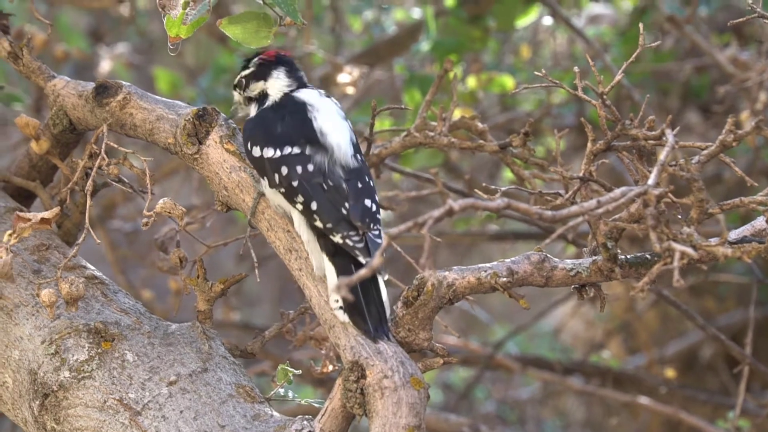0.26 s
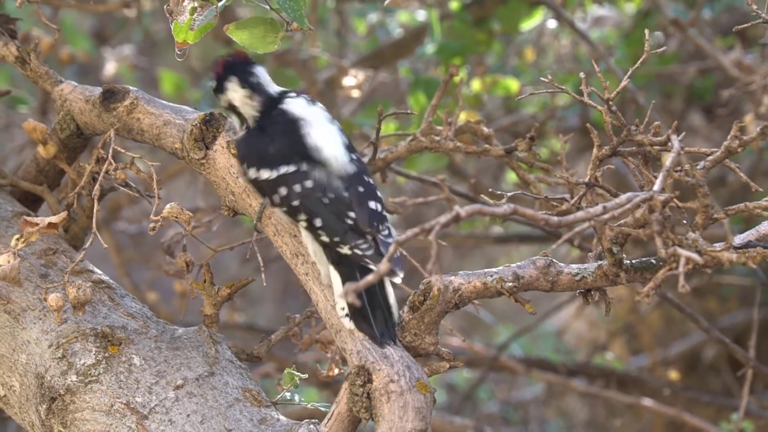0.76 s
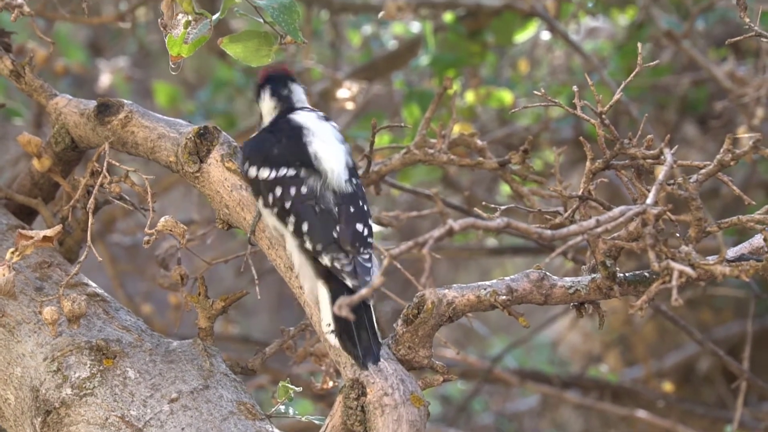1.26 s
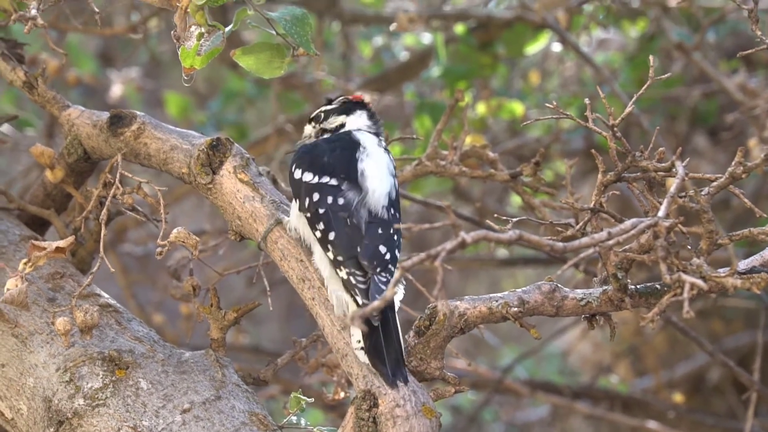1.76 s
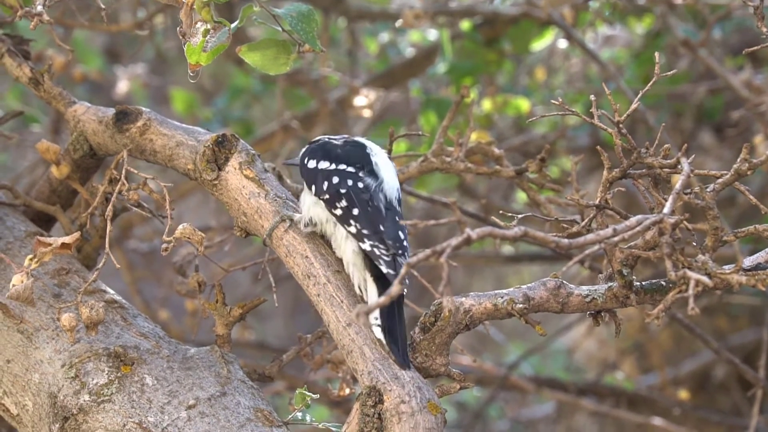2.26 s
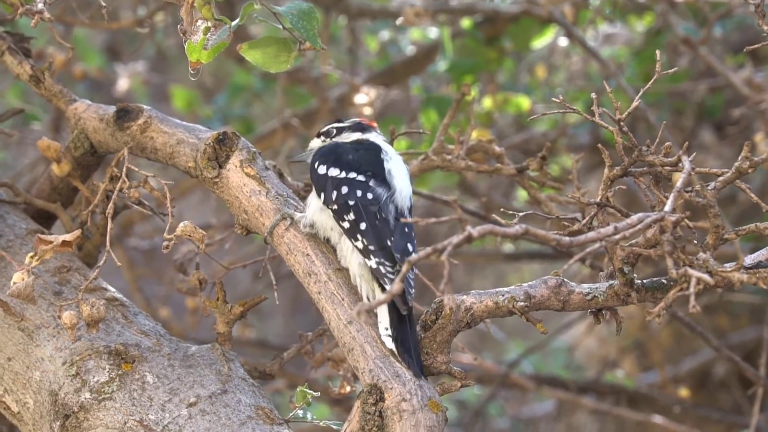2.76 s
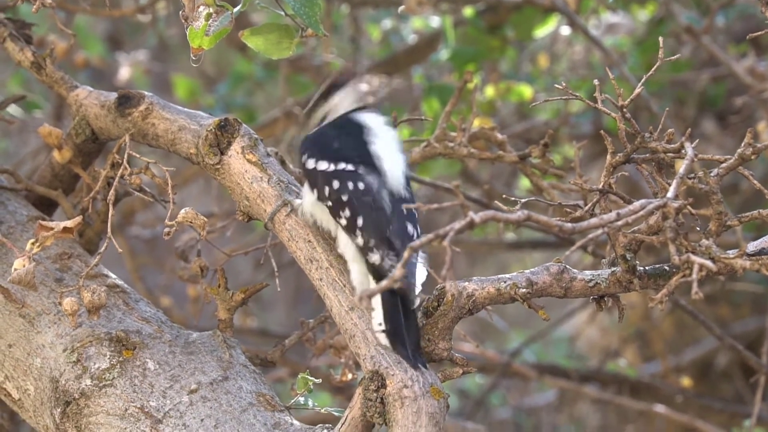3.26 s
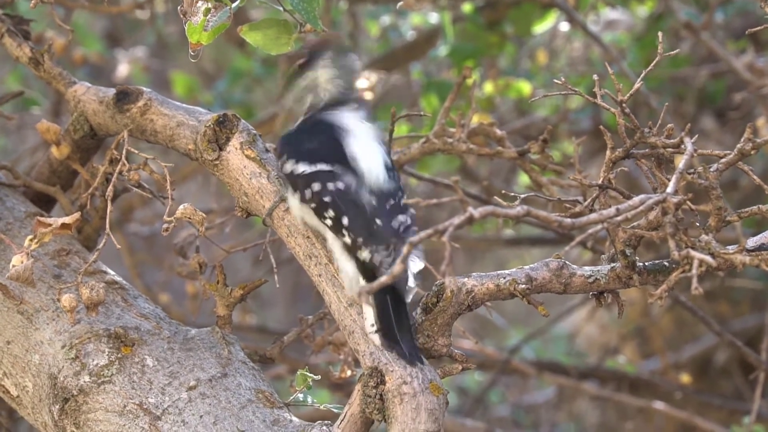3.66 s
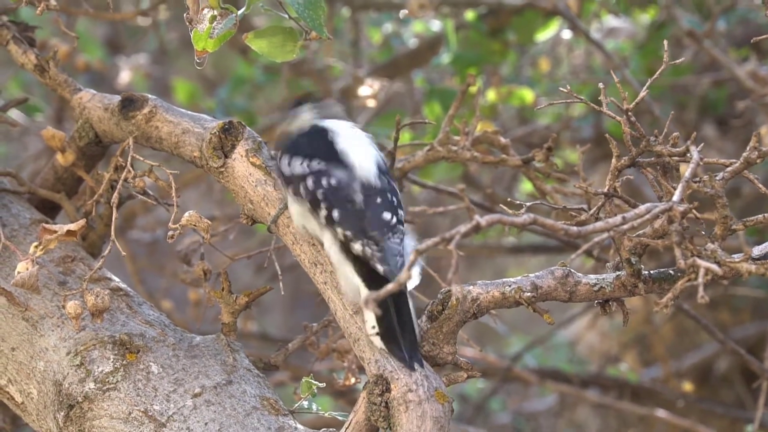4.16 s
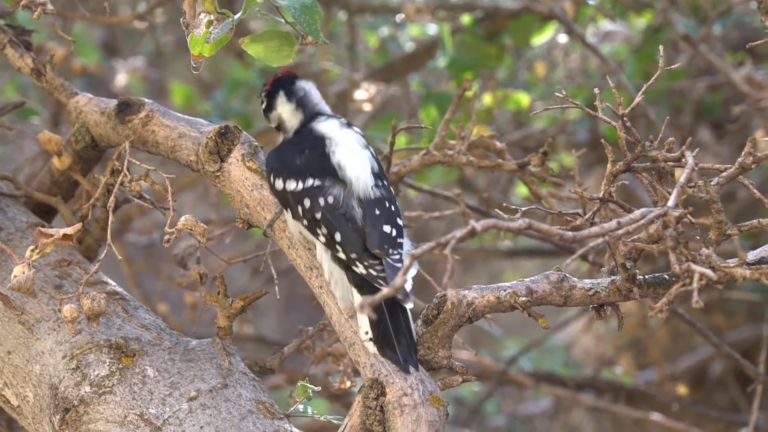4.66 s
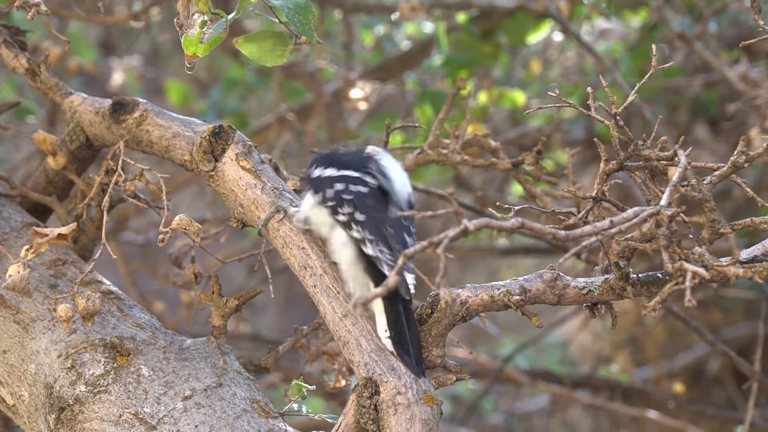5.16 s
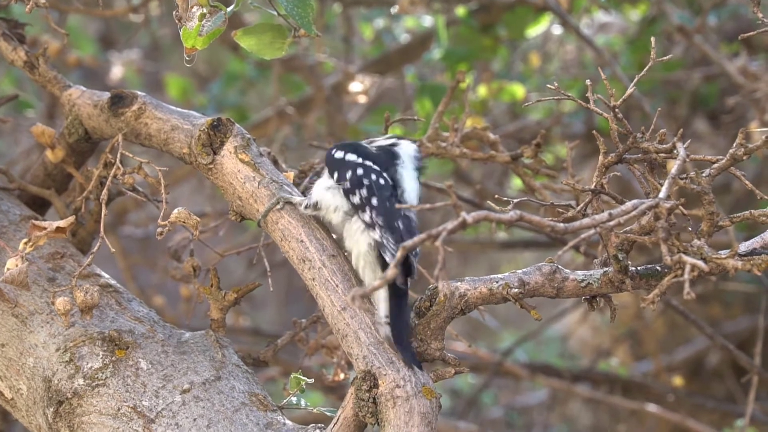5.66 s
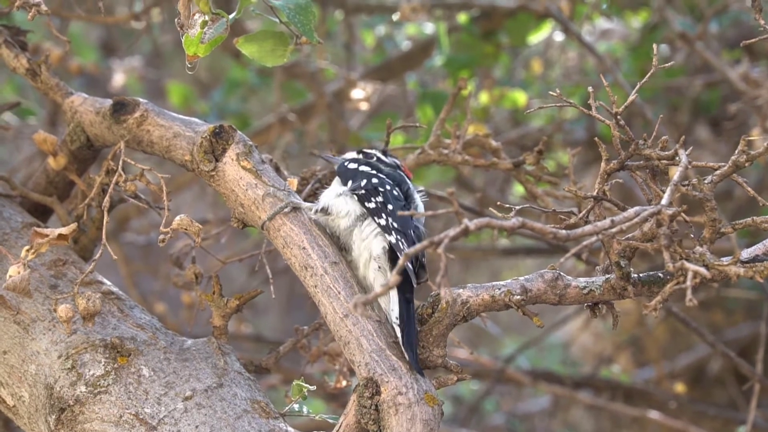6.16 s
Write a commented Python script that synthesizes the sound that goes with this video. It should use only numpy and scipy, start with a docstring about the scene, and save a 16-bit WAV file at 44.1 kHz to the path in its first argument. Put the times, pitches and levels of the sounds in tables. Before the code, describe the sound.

Outdoors, a small woodpecker pecks a dead branch a few metres away: short, hollow, woody knocks with dry beak ticks, irregularly spaced. A reflex camera close on the left clacks once early on, then fires a quick burst of three late. Strongest pecks come mid-way, sharp and slightly overloaded; later ones are softer. Distant traffic and leaves make a steady, low, gently flickering hiss.

```python
"""Outdoors, near a dead branch: traffic and leaves hiss far off, as noise bands that flicker and drift.
Close on the left a reflex camera fires once, later three times in a row: noise bursts ring body modes
for latches, mirror and shutter, over a wind motor that rattles the same modes.
A small woodpecker taps a few metres off: noisy beak ticks on bark, clicks through resonances for the wood.
The loudest hits overload the recorder."""
import sys
import numpy as np
from scipy import signal
from scipy.fft import rfft, irfft
from scipy.io import wavfile
from scipy.ndimage import uniform_filter1d

SR = 44100
rng = np.random.default_rng(int(sys.argv[2]) if len(sys.argv) > 2 else 0)


def transcribe(u):
    """Save the signal u as a 16-bit wav file named by the first command-line argument.

    u: samples, shape (n,) or (channels, n), limited to [-1, 1]; the rate is SR.
    q: integer samples, one column per channel.
    """
    v = np.clip(np.atleast_2d(u).T, -1, 1)
    q = np.round(v * 32767).astype(np.int16)
    wavfile.write(sys.argv[1], SR, q)


N = 282240


def undb(db):
    """Decibels to gain."""
    return 10 ** (np.asarray(db) / 20)


def unit(x):
    """Scaled to rms 1."""
    return x / np.sqrt(np.mean(x ** 2))


def peak(x, db):
    """Scaled so that the highest swing of the channel mean is db."""
    return x * undb(db) / np.abs(np.mean(np.atleast_2d(x), axis=0)).max()


def clack_level(x, db):
    """Scaled to db rms over the first 10 ms."""
    return x * undb(db) / np.sqrt(np.mean(x[:, :SR // 100] ** 2))


def pan(left_minus_right_db):
    """Left and right gains, half the difference each."""
    return undb(np.array([left_minus_right_db, -left_minus_right_db]) / 2)


def band(x, hz, width_hz):
    """Resonance of gain 1 at its centre."""
    return signal.lfilter(*signal.iirpeak(hz, hz / width_hz, fs=SR), x)


def band_twice(x, hz, width_hz):
    """Two equal resonances in a row: steeper skirts."""
    return band(band(x, hz, width_hz), hz, width_hz)


def swell(x, hz, width_hz):
    """Three resonances in a row: a click becomes a packet that swells and fades."""
    return band(band_twice(x, hz, width_hz), hz, width_hz)


def between(x, lo_hz, hi_hz):
    """Steep band-pass."""
    return signal.sosfilt(signal.butter(3, [lo_hz, hi_hz], "bandpass", fs=SR, output="sos"), x)


def low(x, hz, order=14):
    """Very steep low-pass."""
    return signal.sosfilt(signal.ellip(order, .3, 80, hz, fs=SR, output="sos"), x)


def burst(rise_s, fall_s, size=4096):
    """Envelope of a contact: quick rise, exponential fall, top 1."""
    t = np.arange(size) / SR
    e = (1 - np.exp(-t / rise_s)) * np.exp(-t / fall_s)
    return e / e.max()


def click(ms, at_ms):
    """Triangle one sample to each side of at_ms: a click placed between samples."""
    return np.maximum(1 - np.abs(ms - at_ms) * SR / 1000, 0)


def ring(push, hz, t60_s):
    """A decaying mode driven by a push: one complex pole."""
    pole = np.exp(2j * np.pi * hz / SR - np.log(1000) / (t60_s * SR))
    return signal.lfilter([1], [1, -pole], push).imag


def add(out, s, x):
    """Mix x in at time s."""
    i = int(s * SR)
    out[:, i:i + x.shape[-1]] += x[..., :N - i]


def walk(rate_hz):
    """Random levels held 1 / rate_hz and slewed twice; spread near 1."""
    hold = int(SR / rate_hz)
    steps = np.repeat(rng.standard_normal(N // hold + 1), hold)
    return 1.69 * uniform_filter1d(uniform_filter1d(steps, hold), hold)[:N]


# faint deep rumble near 80 Hz: (time [s], level [dB rms])
RUMBLE = [(0, -79), (1.4, -84), (4.6, -75.5), (5.3, -81), (5.8, -70.5), (6.4, -73.5)]


def rumble():
    """Noise through a low resonance, level wandering, partly alike left and right."""
    t = np.arange(N) / SR
    noise = rng.standard_normal(N) + 0.78 * rng.standard_normal((2, N))
    deep = band_twice(noise, 82, 60) * undb(3.34 * walk(11))
    return unit(deep) * undb(np.interp(t, *np.transpose(RUMBLE)))


# spectral shape of traffic and leaves: (frequency [Hz], relative density [dB per Hz])
HISS_SHAPE = [(76, -72), (130, -41.5), (258, -21.5), (294, -12), (382, -13.5), (585, -7), (642, -7.5),
              (966, 0.5), (1210, -3), (1450, -5), (1660, -13), (3050, -23.5), (3480, -31.5), (4680, -33),
              (11000, -43.5), (14300, -82), (22000, -120)]
# (time [s], level under 3 kHz [dB rms], level above [dB rms], left minus right [dB])
HISS_LEVEL = [(0, -33.5, -60, 2.5), (.45, -34.5, -61, 3), (.9, -33.5, -59, 4), (1.23, -36, -62, 3),
              (2.33, -35, -63.5, 4), (2.66, -38, -64, 2.5), (3.12, -34, -56, 1), (3.44, -36, -59.5, 2.1),
              (4.12, -37.5, -63, 3), (5.2, -36.5, -60.5, 3), (5.8, -37, -62, 1.4),
              (6.27, -36.5, -63.5, 2.5), (6.4, -42.5, -64, 3)]
# (frequency [Hz], left-right correlation [-1 to 1])
ALIKE = [(60, .7), (130, 0.29), (290, 0.91), (640, 0.83), (1400, 0.47), (3100, 0.044), (6800, 0.1)]


def hiss():
    """Shaped noise in quarter-octave bands, each flickering and drifting alone; correlation by mid and side."""
    t = np.arange(N) / SR
    s, *columns = np.transpose(HISS_LEVEL)
    low_db, treble_db, pan_db = (np.interp(t, s, c) for c in columns)
    bins_hz = np.fft.rfftfreq(N, 1 / SR) + 1e-9
    shape_hz, shape_db = np.transpose(HISS_SHAPE)
    alike_hz, correlation = np.transpose(ALIKE)
    alike = np.clip(np.interp(np.log(bins_hz), np.log(alike_hz), correlation), 0, .99)
    shape = undb(np.interp(np.log(bins_hz), np.log(shape_hz), shape_db))
    mid, side = rfft(rng.standard_normal((2, N))) * shape * np.sqrt([1 + alike, 1 - alike])
    pair = np.array([mid + side, mid - side])
    bass, treble = np.zeros((2, N)), np.zeros((2, N))
    for step in range(-14, 16):  # quarter octaves from 1 kHz
        is_bass = step <= 6
        share = np.clip(1 - np.abs(4 * np.log2(bins_hz / 1000) - step), 0, 1)
        flicker_db = (2.1 if is_bass else 1.1) * walk(14)
        drift_db = 0.9 * walk(3.006)
        part = bass if is_bass else treble
        part += undb(flicker_db + drift_db) * irfft(pair * share, N)
    return (unit(bass) * undb(low_db) + unit(treble) * undb(treble_db)) * pan(pan_db)


# faint treble bands: (centre [Hz], width of each of two passes [Hz], middle level [dB rms])
WAVER = [(4510, 300, -72.5), (5240, 640, -72.5), (5980, 300, -77.5), (9900, 900, -76.5)]


def waver():
    """Narrow noise bands in the treble; each wavers slowly and quickly by itself."""
    out = np.zeros((2, N))
    for hz, width_hz, db in WAVER:
        noise = band_twice(rng.standard_normal((2, N)), hz, width_hz)
        out += unit(noise) * undb(db + 1.5 * walk(4.1) + 1.5 * walk(25))
    return out


# runs of frames, one per button press: (mirror slap times [s])
PRESSES = [
    [0.6089],
    [4.8134, 4.9217, 5.029],
]
# The four clack tables: (time from slap [ms], low modes over 10 ms, before the body filter [dB rms],
# top snap peak [dB], then mode groups near 3, 4.7, 6.2, 7.7, 9.7 kHz [dB re low modes])
# once per press, as the button goes down
RELEASE = [(-84.5, -33, -70, -11, -10, -20, -25, -20), (-80.5, -18.5, -60, -10.5, -4, -23.5, -24, -16.5)]
# every frame
CYCLE = [(-50, -31, -70, -18, -11, -23, -24, -22), (-42, -19, -67, -15, -9, -23, -24, -19.5),
         (-32.5, -29.5, -70, -14, -9, -16, -22, -19.5), (-18.5, -23.5, -60, -2, -5, -11.5, -12.5, -10),
         (-7.5, -26, -60, -9, -10, -20, -15, -10), (-0.5, -12.5, -21, -1.5, -8.5, -11.5, -11.5, -11),
         (4, -24, -50, -3, -6, -10, -15.5, -12)]
# when another frame follows
RECOCK = [(11.98, -13.5, -20, 0.1, -5.5, -4, -8.5, -10), (28.9, -18.5, -30.5, -3, 1.3, -14, -11, -10.5)]
# after the last frame
REST = [(9.9, -16, -27, .7, -5.5, -6, -10, -8.5)]


def clacks():
    """Every contact in order as (s, levels): release, then each frame's cycle and its recock or rest."""
    rows = []
    for frames in PRESSES:
        for slap_s in frames:
            before = RELEASE if slap_s == frames[0] else []
            after = REST if slap_s == frames[-1] else RECOCK
            rows += [(slap_s + ms / 1000, *levels) for ms, *levels in before + CYCLE + after]
    return rows


# camera body modes: (frequency [Hz], level within its group [dB], t60 [s], left minus right [dB])
BODY = [(740, -16.5, 0.046, 4), (1448, -6, 0.04, 5), (1600, -5.5, 0.024, 7.5), (1792, -6.5, 0.019, 8),
        (2186, -19.5, 0.024, 11), (2650, 1.5, 0.0069, 7.5), (3145, -1, 0.013, 10.5),
        (4065, -10, 0.0067, 13), (4630, -3, 0.008, 7), (5100, -8.5, 0.0074, 7), (6100, -18, 0.012, 0),
        (6430, -20, 0.0083, -0.5), (7450, -18, 0.0027, 0.5), (7900, -11, 0.0073, 5), (9350, -17, 0.012, 6),
        (10130, -20, 0.01, 1)]
# edges of the six mode groups: (index into BODY)
GROUP_EDGES = [0, 5, 7, 10, 12, 14, 16]


def clack(db, groups_db):
    """A noise burst and weaker bounce ring the body; treble reaches the two ports less alike.

    Also returns a modeless snap near the top of hearing."""
    noise, spot = rng.standard_normal((3, 4096)), rng.standard_normal((len(BODY), 2))
    blow = burst(0.0011, 0.0018)
    bounce = blow + undb(-16.5) * burst(0.0023, 0.0084)
    modes = []
    for (hz, mode_db, t60_s, pan_db), (level, tune) in zip(BODY, spot):
        push = (noise[0] + min(hz / 3500, 1.2) * noise[1:]) * bounce
        gain = undb(mode_db + 2.8 * level) * pan(np.array([pan_db]))
        modes.append(gain * ring(push, hz * (1 + 0.013 * tune), t60_s))
    groups = zip([0] + groups_db, GROUP_EDGES, GROUP_EDGES[1:])
    struck = sum(clack_level(sum(modes[a:b]), db + group_db) for group_db, a, b in groups)
    snap = noise[1:] * (blow + undb(-27.0) * burst(.002, .004))
    return struck, between(between(snap, 9800, 13300), 10300, 18000)


# wind motor and gears: (time from slap [s], level before the body filter [dB rms])
MOTOR = [(-.15, -58), (-.088, -36.5), (-.055, -28.5), (-.008, -22.5), (.025, -28), (.052, -44.5),
         (.14, -60)]


def motor():
    """Rough gear noise rattles the body modes, their level spread and t60 reduced."""
    gears = (rng.standard_normal(N) + 0.81 * rng.standard_normal((2, N))) * undb(1.7 * walk(310))
    whirr = unit(sum(undb(0.48 * db) * pan(np.array([pan_db])) * ring(gears, hz, 0.43 * t60_s)
                     for hz, db, t60_s, pan_db in BODY))
    t = np.arange(N) / SR
    level_s, level_db = np.transpose(MOTOR)
    frames_db = [np.interp(t - slap_s, level_s, level_db, left=-99, right=-99)
                 for frames in PRESSES for slap_s in frames]
    return undb(np.max(frames_db, axis=0)) * whirr


def camera():
    """Clacks and motor through the body filter; separately, the top snaps of the hard clacks."""
    out, top = np.zeros((2, N)), np.zeros((2, N))
    for s, db, top_db, *groups_db in clacks():
        struck, snap = clack(db, groups_db)
        add(out, s - .0005, struck)
        if top_db > -52:
            add(top, s - .0005, peak(snap * pan(np.array([8])), top_db))
    body = out + motor()
    body = between(between(body, 1250, 16000), 1150, 18000) + undb(-3.5) * between(body, 380, 1000)
    return body, top


# branch modes: (frequency [Hz], level within its group [dB], t60 [s])
BRANCH = [(402, -5, 0.04), (588, -2, 0.026), (702, 7.5, 0.034), (830, 7, 0.025), (947, 4, 0.03),
          (1023, 16, 0.064), (1147, 13.5, 0.047), (1193, 8, 0.035), (1397, 1, 0.034), (1513, 0, 0.03),
          (1750, -4, 0.027), (2294, -17, 0.03), (3200, -21, 0.011)]
THUD_WIDTH_HZ, LOW_THUD_HZ, LOW_WIDTH_HZ = 334, 691, 226  # widths of each of three passes
RING_DB, HIGH_MODES_DB = -5, -12  # re thud
RING_WITH_LOW = .3  # weak low modes ring less above too [dB per dB]
SWELL_MS, STIR_MS, LINGER_MS = 1.4, 5, 16  # rise of the ring push, hard stir, gentle stir


def knock(ms, halo, db, low_db, lag_ms, thud_hz, gap_ms, rebound_db):
    """Blow and rebound click through resonances as a dry thud; noise, with a faint halo, rings the modes."""
    noise, spot = rng.standard_normal((2, len(ms))), rng.standard_normal(len(BRANCH))
    late = np.maximum(ms - lag_ms, 0)
    stir = np.exp(-(late / STIR_MS) ** 2) + .45 * np.exp(-late / LINGER_MS)
    push = noise[0] * (1 - np.exp(-late / SWELL_MS)) * stir + undb(-11) * noise[1] * halo
    # each spot stirs the modes in other shares
    modes = [undb(mode_db + 2.0 * c) * ring(push, hz * (1 + 0.019 * c), t60_s)
             for (hz, mode_db, t60_s), c in zip(BRANCH, spot)]
    first = click(ms, lag_ms)
    blows = first + undb(rebound_db) * click(ms, lag_ms + gap_ms)
    thud = peak(swell(blows, thud_hz, THUD_WIDTH_HZ), db)
    low_thud = peak(swell(first, LOW_THUD_HZ * (1 + .04 * spot[0]), LOW_WIDTH_HZ), db + low_db)
    upper_db = db + RING_WITH_LOW * low_db
    low_ring = peak(between(sum(modes[:4]), 316, 880), db + low_db + RING_DB)
    mid_ring = peak(between(sum(modes[4:8]), 726, 1303), upper_db + RING_DB)
    high_ring = peak(between(sum(modes[8:]), 1380, 4200), upper_db + HIGH_MODES_DB)
    return thud + low_thud + low_ring + mid_ring + high_ring


# bark colours: (centre [Hz], width before a factor 1.5 [Hz], relative level [dB])
BARK = [(2540, 400, -10), (3300, 880, -6), (3800, 310, -9), (5240, 820, -1.5), (5650, 400, -4),
        (6900, 920, -10), (8000, 340, -4), (9860, 1500, -9.5)]
SOFT_BELOW_DB, SOFT_HALO = -24, 0.72  # fainter ticks: narrower, longer, more halo [dB per dB]
SHARP_CLICK = 4.4  # click amplitude of a hard tick, re crackle


def tick(ms, halo, tick_db, tick_hz, bark_db):
    """Crackle, a sharp click and a noise halo, coloured by the beak band and patchy bark bands."""
    noise, spot = rng.standard_normal((3, len(ms))), rng.standard_normal(len(BARK))
    after = np.maximum(ms, 0)
    soft = max(SOFT_BELOW_DB - tick_db, 0)
    snap = after / (0.7 + 0.048 * soft)
    crack = (noise[0] + 0.38 * noise[1:]) * snap * np.exp(1 - snap)
    crack += SHARP_CLICK / (1 + .9 * soft) * np.exp(-((ms - 1.3) / 0.031) ** 2)
    tail = undb(-9.5) * (1 - np.exp(-after / 2.8)) * np.exp(-after / 9)
    crack += noise[1:] * (tail + undb(-24.5 + SOFT_HALO * soft) * halo)
    out = band_twice(crack, tick_hz, 1800 / (1 + 0.094 * soft))
    for (hz, width_hz, colour_db), c in zip(BARK, spot):
        gain_db = colour_db + bark_db + 3.0 * c - .5 * soft * (hz < 4000)
        out += undb(gain_db) * band_twice(crack, hz, 1.5 * width_hz)
    return peak(out, tick_db)


# pecks: (time [s], thud peak [dB], low thud re thud [dB], thud lag [ms], thud frequency [Hz],
# rebound gap [ms], rebound re blow [dB], tick peak [dB], tick centre [Hz], bark colours relative [dB])
PECKS = [(0.056, -13, -10, 1.3, 1034, 6, -4, -42, 3820, -8),
         (0.1906, -10, -9, 1.58, 1110, 5.5, -0.5, -28.5, 3870, -9),
         (0.3463, -23.5, -18, 0.09, 1060, 6, -15, -57, 3800, -5),
         (0.397, -13, -17, 0.82, 1050, 6.4, 1, -43, 4300, -11),
         (0.9394, -11, -4, 1.01, 1100, 7.3, 5, -28.5, 5840, -2),
         (1.4565, -37, 3.5, 3.1, 1050, 6, -10, -40, 6160, 1),
         (1.5108, -27, -1, 2.8, 1040, 6, -5, -56, 3010, -5),
         (1.619, -27.5, 1.5, 2.55, 1050, 6, -5.5, -42, 5230, -3),
         (1.641, -13.5, -7.5, 2.36, 1020, 4.5, 2.5, -24.5, 8350, -7),
         (2.8874, -11.5, -7.5, 1.83, 1100, 4.5, 0.5, -21.5, 7830, 0),
         (3.032, -14, -2.5, 2.48, 1040, 4.7, 1, -9.5, 6900, -3),
         (3.1889, -11.5, -2.5, 1.67, 1057, 7.5, -5, -10.5, 7700, 3),
         (3.364, -12.5, -3.5, 1.2, 1040, 7.5, -2.5, -21, 8500, -1),
         (3.5332, -24.5, -4, 4.3, 1110, 6.4, -6, -30, 5140, 9),
         (3.6943, -32, -16, 3.9, 1100, 6, -5, -41, 5840, -2),
         (3.8387, -25.5, -11, 2.5, 1130, 4.5, 6, -32.5, 5240, -7),
         (4.1462, -47, 11, 3, 1100, 6, -5, -35.5, 6980, -11),
         (4.2847, -50, -2, 3, 1100, 6, -5, -45, 5940, -1),
         (4.434, -30, -11, 3.7, 1090, 6, -5, -44.5, 5000, -5),
         (5.4578, -24, -18, 6.9, 1120, 5, -12, -38.5, 5100, -6),
         (5.5831, -23, -8.5, 6.7, 1140, 4, -12, -39.5, 7650, -9),
         (5.689, -21, -23, 3.6, 1100, 4.6, -19, -49, 5200, -2),
         (5.7074, -16, -21, 3.7, 1110, 4, 9, -31.5, 5100, -11),
         (5.86, -54, -1, 3.3, 1100, 6, -5, -41, 5500, -5),
         (5.994, -25, -9.5, .1, 1100, 6, -7, -40, 4570, -5)]


def woodpecker():
    """Each peck: a bright tick on bark, then the wood's knock; faint noise swells and fades around it."""
    out = np.zeros((2, N))
    lead_ms = 50  # room for the noise before the blow
    ms = np.arange(4096) / SR * 1000 - lead_ms
    halo = np.exp(-(ms / 24) ** 2)
    for s, *knock_row, tick_db, tick_hz, bark_db in PECKS:
        wood = knock(ms, halo, *knock_row) * pan(np.array([1.2]))
        add(out, s - lead_ms / 1000, tick(ms, halo, tick_db, tick_hz, bark_db) + wood)
    return out


MAIN_TOP_HZ = 11000  # top of everything but the snaps


def scene():
    """Everything is cut at MAIN_TOP_HZ except the top snaps of the hard camera clacks."""
    body, top = camera()
    return low(hiss() + rumble() + waver() + body + woodpecker(), MAIN_TOP_HZ) + top


OVERLOAD_FROM, THUMP_DB, TOP_HZ = .33, -10, 15900  # overload threshold [full scale 1]


def record(dry):
    """Right port a sample late; squared overload, low-passed, adds a one-sided thump; peaks clip; top is cut."""
    dry = np.array([dry[0], np.roll(dry[1], 1)])
    excess = np.clip(np.abs(dry) - OVERLOAD_FROM, 0, 1) ** 2
    dry = dry + undb(THUMP_DB) * signal.lfilter(*signal.butter(2, 520, fs=SR), excess)
    return np.clip(low(np.clip(dry, -1, 1), TOP_HZ, order=9), -1, 1)


dry = scene()
out = record(dry)
transcribe(out)
```